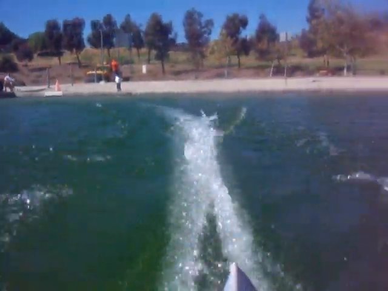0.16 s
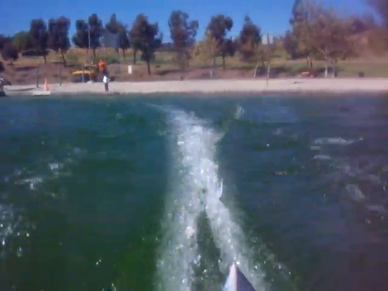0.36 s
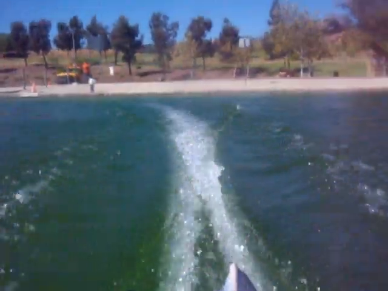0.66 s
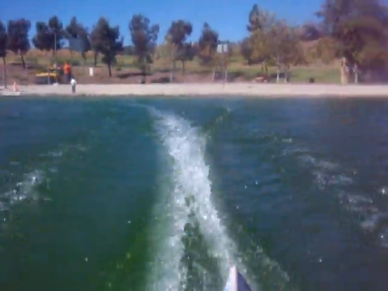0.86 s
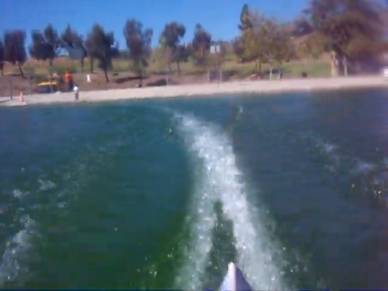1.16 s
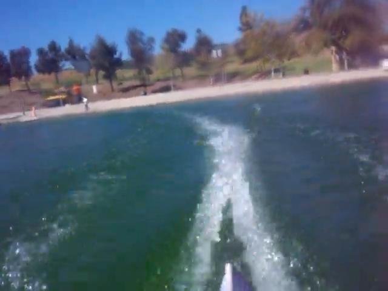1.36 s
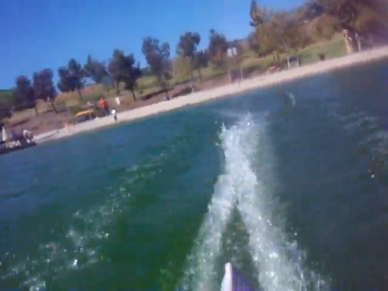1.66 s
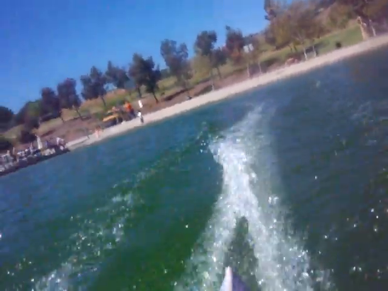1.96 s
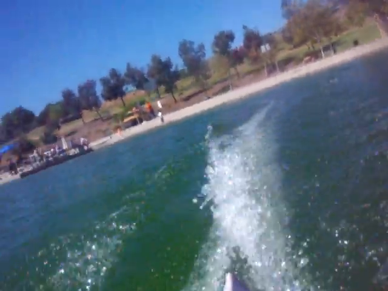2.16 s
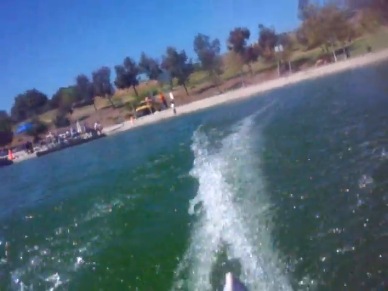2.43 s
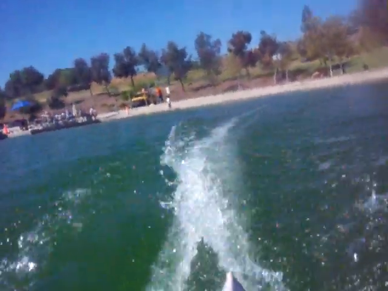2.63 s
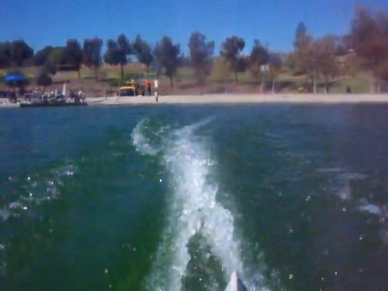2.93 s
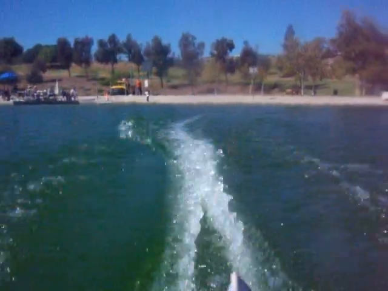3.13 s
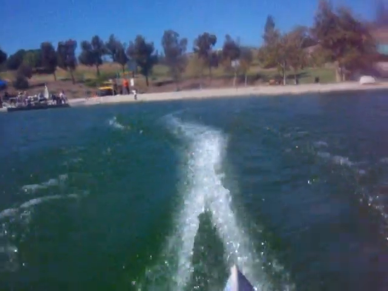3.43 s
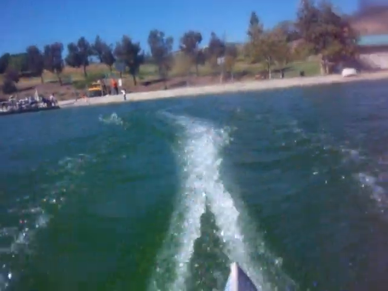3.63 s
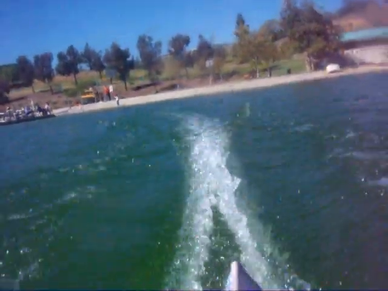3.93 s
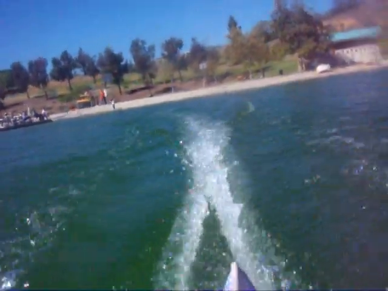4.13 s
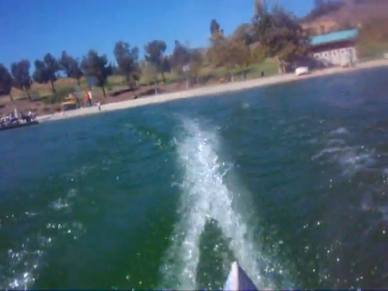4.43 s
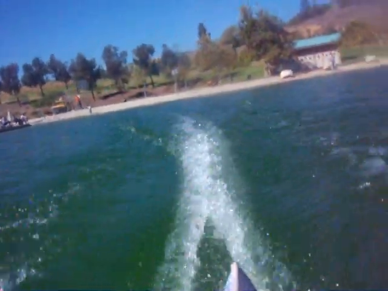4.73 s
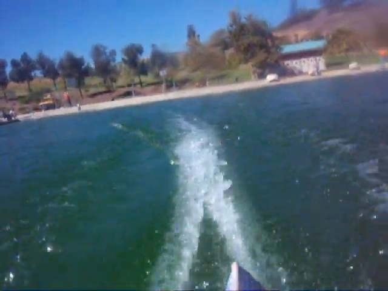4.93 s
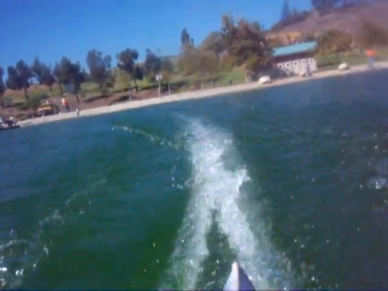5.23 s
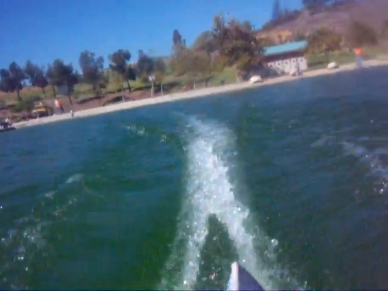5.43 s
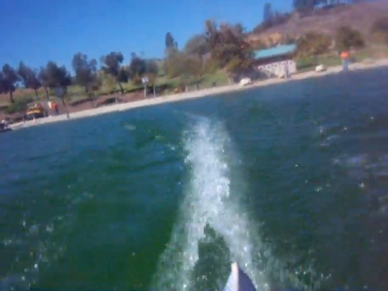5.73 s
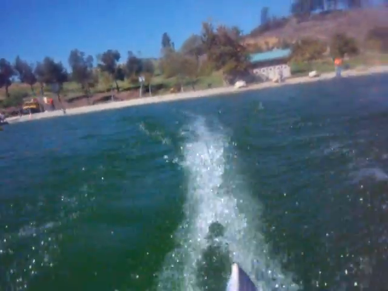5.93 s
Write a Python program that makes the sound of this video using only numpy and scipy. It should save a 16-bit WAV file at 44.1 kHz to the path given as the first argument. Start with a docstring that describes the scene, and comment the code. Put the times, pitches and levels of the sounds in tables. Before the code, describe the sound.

From 0 seconds a model speedboat is already at full speed, its motor a loud, harsh low buzz around 160 hertz, heard from an overloaded microphone on deck. The pitch is almost constant, sinking very slightly after about 2 seconds. The drone sags briefly near 0.5, 1.0, 1.7, 2.1 and 2.4 seconds, with its octave swelling brighter between. From about 1 second a rough, deeper growl thickens the buzz, easing and returning around 2.6. Between 3.5 and 4.3 seconds the dips cluster and the growl surges, giving a coarse stutter. More sags follow near 5.0 and 5.7. Throughout, water rushes lumpily along the hull, low and muffled, a little weaker near 1.25 and stronger around 5.5, while panels rumble. Fast flutter and hard clipping make a crackling, buzzing treble with a dull top. At about 6 seconds it ends, still running.

```python
"""A harsh, unsteady buzz up close: a model speedboat flat out on a lake, heard from a microphone on its deck.
The propeller's drone is a stack of even shaft partials that dips as two close motor tones would beat;
its octave swells up, and rough wandering tones near 79, 240, 400 and 550 Hz lie between its partials.
Lumpy filtered noise is the water rushing along the hull, and two broad resonances ring with random shaking.
It is far too loud for the microphone, which squares it off."""
import sys
import numpy as np
from scipy import signal
from scipy.fft import rfft, irfft
from scipy.io import wavfile

SR = 44100
rng = np.random.default_rng(int(sys.argv[2]) if len(sys.argv) > 2 else 0)


def store_pcm(level_fs):
    """Save levels as 16-bit WAV."""
    pcm = np.round(np.clip(level_fs, -1, 1) * 32767).astype(np.int16)
    wavfile.write(sys.argv[1], SR, np.atleast_2d(pcm).T)


N = 268128


def from_db(db):
    """Decibels to gain."""
    return 10 ** (np.asarray(db) / 20)


def rms_one(x):
    """Scaled to rms 1."""
    return x / np.sqrt(np.mean(x ** 2) + 1e-20)


def in_time(rows):
    """A curve of (time in s, value) rows, joined by straight lines at every sample."""
    time_s, value = np.transpose(rows)
    return np.interp(np.arange(N) / SR, time_s, value)


def swell(middle_s, length_s):
    """A smooth rise and fall of height 1; the length is taken at half height."""
    half_lengths = 2 * (np.arange(N) / SR - middle_s) / length_s
    return .5 ** (half_lengths ** 2)


def drift(rate_hz):
    """Slow chance of rms 1: noise through two equal one-pole low-passes, each with its corner near rate."""
    step = 40  # samples between drawn values
    settle = 2000  # drawn values dropped while the filter settles
    pole = np.exp(-2 * np.pi * rate_hz * step / SR)
    noise = rng.standard_normal(N // step + settle + 2)
    slow = signal.lfilter([1], [1, -2 * pole, pole * pole], noise)[settle:]
    return np.interp(np.arange(N) / step, np.arange(len(slow)), rms_one(slow))


def partials(angle, table, wander_rate, flutter_db, flutter_rate):
    """Tones that follow the shaft angle; their phases wander apart and their strength flutters together."""
    tones = 0
    for multiple, level_db, wander_rad in table:
        phase = round(multiple) * angle + wander_rad * drift(wander_rate)
        tones = tones + from_db(level_db) * np.cos(phase)
    return np.sqrt(2) * tones * from_db(flutter_db * drift(flutter_rate))


def panel(hz, width_hz, level_db):
    """A hull panel shaken at random rings in one broad resonance."""
    pole = np.exp(-np.pi * width_hz / SR)
    resonance = [1, -2 * pole * np.cos(2 * np.pi * hz / SR), pole * pole]
    ringing = signal.lfilter([1, 0, -1], resonance, rng.standard_normal(N))
    return from_db(level_db) * rms_one(ringing)


def propeller_drone(angle):
    """Each of two blades pushes once a turn, so the drone sits on even multiples of the shaft rate."""
    # partials of the drone: shaft_multiple, relative level_db, phase_wander_rad
    drone_tones = [(2, 0.5, 0.093), (6, -17, 1), (8, -24.5, 1), (10, -27, 1)]
    return partials(angle, drone_tones, wander_rate=1.56, flutter_db=3.0, flutter_rate=19.7)


def drone_octave(angle):
    """A tone an octave above the drone's lowest partial, with its own wander and flutter."""
    # the octave: shaft_multiple, relative level_db, phase_wander_rad
    octave_tones = [(4, 0.008, 0.6)]
    return partials(angle, octave_tones, wander_rate=1.69, flutter_db=1.3, flutter_rate=32)


def rough_tones(angle):
    """Rough wandering tones near 79, 240, 400 and 550 Hz, between the drone's partials, and a low panel."""
    # rough partials: shaft_multiple, relative level_db, phase_wander_rad
    half_rate_tones = [(1, -2.5, 1.47), (3, -1.5, 0.78), (5, -8, 1.22), (7, -14.5, .9)]
    # keel resonance: centre_hz, width_hz, level_db within the rough tones
    keel_panel = (70.84, 6.7, -2.2)
    tones = partials(angle, half_rate_tones, wander_rate=2.4, flutter_db=3.5, flutter_rate=18)
    return tones + panel(*keel_panel)


def drive(turns_per_s, drone_db, octave_db, rough_db):
    """One shaft angle carries the drone, its octave and the rough tones."""
    # the angle itself jitters a little (radians)
    jitter = 0.039 * drift(21)
    angle = 2 * np.pi * np.cumsum(turns_per_s) / SR + jitter
    drone = from_db(drone_db) * propeller_drone(angle)
    octave = from_db(octave_db) * drone_octave(angle)
    rough = from_db(rough_db) * rough_tones(angle)
    # subtracted, the octave dents the crest of the drone
    return drone - octave + rough


def coloured_noise(spectrum):
    """Noise of rms 1 with the given spectrum, joined straight over log frequency."""
    hz, level_db = np.transpose(spectrum)
    bins_hz = np.maximum(np.arange(N // 2 + 1) * SR / N, 1)
    gain = from_db(np.interp(np.log(bins_hz), np.log(hz), level_db))
    return rms_one(irfft(rfft(rng.standard_normal(N)) * gain, N))


def water(rush_db, lumpy_db, wake_db):
    """Water rushes along the hull as noise in quick lumps, and a deck panel rings with it."""
    # spectrum of the rush: frequency_hz, relative density_db (per Hz)
    rush_spectrum = [(20, -4.5), (45, -8), (75, 5), (120, 3), (200, 1.5), (350, 1.5), (550, -5), (900, -17),
                     (1400, -15.5), (2500, -39.5), (5000, -60), (8000, -70)]
    # deck resonance: centre_hz, width_hz, level_db within the water
    deck_panel = (180.8, 19, -9)
    rush = coloured_noise(rush_spectrum) * from_db(wake_db + lumpy_db * drift(25))
    return from_db(rush_db) * (rush + panel(*deck_panel))


def ride():
    """Levels in dB: the drone dips as two close motor tones beat, while the rough tones often rise."""
    # dips of the drone: middle_s, length_s, drone_loss_db, rough_rise_db
    beat_dips = [(0.0, 0.092, 3, 6), (0.461, .28, 6.5, 2), (1.013, 0.11, 9, 1.5), (1.668, 0.26, 5.5, 0.5),
                 (2.084, 0.13, 9, -1.5), (2.395, 0.14, 7, 0), (2.758, 0.29, 3, 2), (3.521, 0.23, 7, 4.5),
                 (3.783, .14, 2.5, 11.5), (4.089, 0.14, 2.5, 12), (4.266, 0.088, 12, 2.5),
                 (5.012, 0.17, 6.5, 0), (5.685, 0.2, 9.5, 0.5), (6.08, 0.13, 7, 6.5)]
    # the octave of the drone swells up between beats: middle_s, length_s, octave_rise_db
    octave_swells = [(0.025, 0.023, 18), (0.245, 0.24, 13.5), (.67, 0.18, 9.5), (1.006, 0.25, 8.5),
                     (1.377, 0.12, 7), (1.576, 0.14, 11), (1.92, 0.12, 11.5), (2.295, 0.094, 15),
                     (2.455, 0.07, 10), (2.63, 0.14, 13), (2.979, 0.11, 13), (3.367, 0.21, 13),
                     (4.192, 0.17, 13), (4.78, 0.36, 12), (5.517, 0.34, 8.5)]
    # uneven rise and fall of the rough half-rate tones: time_s, level_db
    rough_level = [(0, -22.5), (.65, -8.5), (.87, -18.5), (1.05, -3.5), (1.3, -5.5), (1.9, -11.5),
                   (2.6, -7), (3.1, -13.5), (3.95, -16), (4.7, -8.5), (6.08, -13)]
    # rushing water: time_s, level_db
    rush_level = [(0, -7.5), (.85, -8), (1.25, -12.5), (1.8, -7), (2.5, -10.5), (3.2, -8), (3.95, -9.5),
                  (5.05, -7), (5.6, -6.5), (6.08, -11)]
    base_thrust_db, base_slap_db = 3, -14  # drone and octave, between dips and swells
    loss_db = sum(loss * swell(middle, length) for middle, length, loss, _ in beat_dips)
    rough_rise_db = sum(rise * swell(middle, length) for middle, length, _, rise in beat_dips)
    octave_rise_db = sum(rise * swell(middle, length) for middle, length, rise in octave_swells)
    drone_db = base_thrust_db - loss_db
    octave_db = base_slap_db + octave_rise_db
    rough_db = in_time(rough_level) + rough_rise_db
    return drone_db, octave_db, rough_db, in_time(rush_level)


def scene():
    """Drive and water reach the deck microphone together, under one fast random flutter."""
    # motor speed: time_s, shaft_turns_per_s
    motor_speed = [(0, 79.2), (.45, 79.9), (1.2, 80), (1.9, 79.8), (2.15, 79), (2.55, 78.4), (3.3, 78.2),
                   (3.55, 78.7), (5.05, 78.8), (5.45, 78.3), (6.08, 78.1)]
    drone_db, octave_db, rough_db, rush_db = ride()
    boat = drive(in_time(motor_speed), drone_db, octave_db, rough_db)
    boat = boat + water(rush_db, lumpy_db=0.77, wake_db=0.35)
    # a fast random 1 dB flutter of the whole sound, which makes the treble crackle
    flutter_db = 1 * drift(60)
    return (boat * from_db(flutter_db))[None]


def record(dry):
    """The slightly biased microphone input clips hard, which makes the buzzing treble; the top is cut."""
    input_bias, overload = -0.025, 0.68  # both in full scale
    cutoff_hz = 8150
    squared = np.clip(dry + input_bias, -overload, overload)
    rounded = signal.sosfilt(signal.butter(1, 8500, fs=SR, output="sos"), squared)
    low_pass = signal.firwin(71, cutoff_hz, fs=SR, window=("kaiser", 2.5))
    return signal.fftconvolve(rounded, low_pass[None], mode="same", axes=1)


dry = scene()
out = record(dry)
store_pcm(out)
```